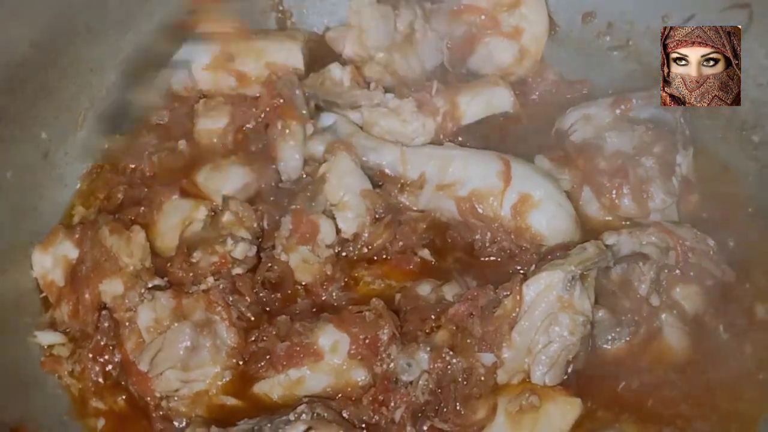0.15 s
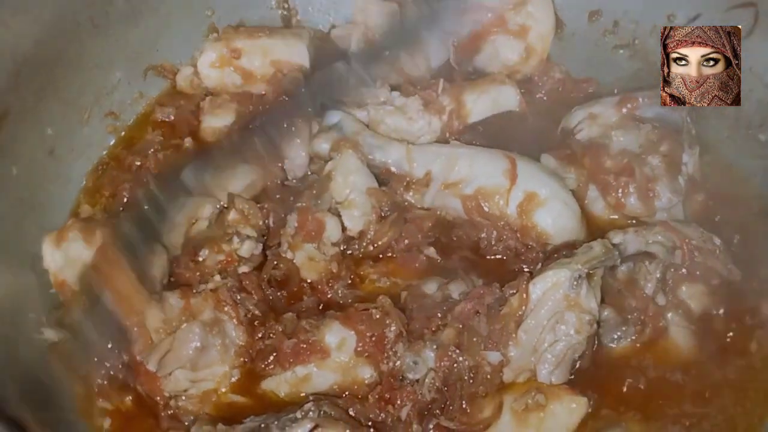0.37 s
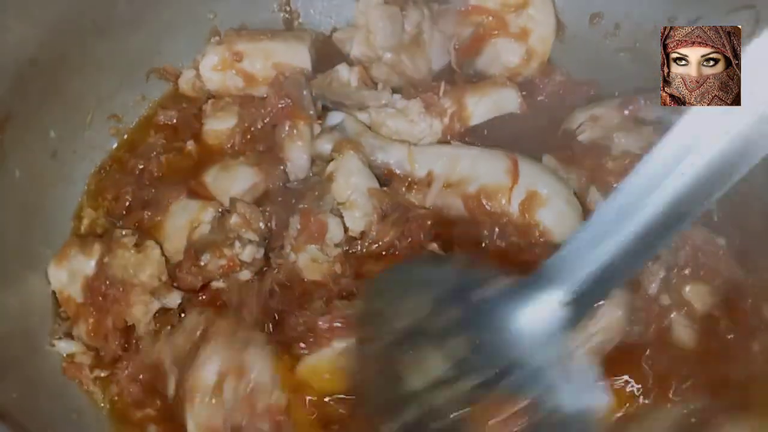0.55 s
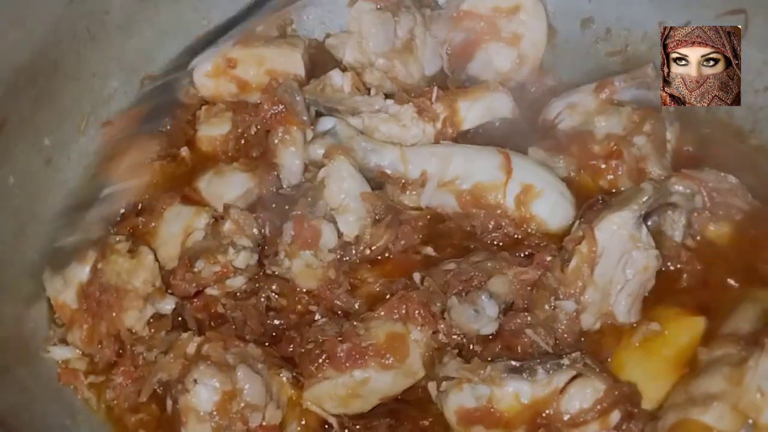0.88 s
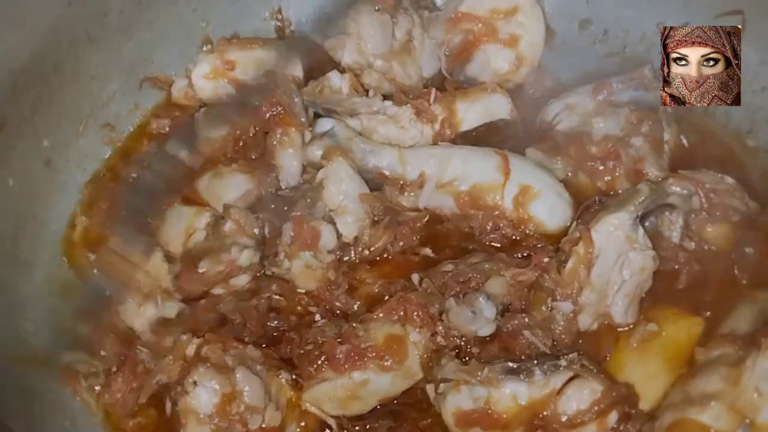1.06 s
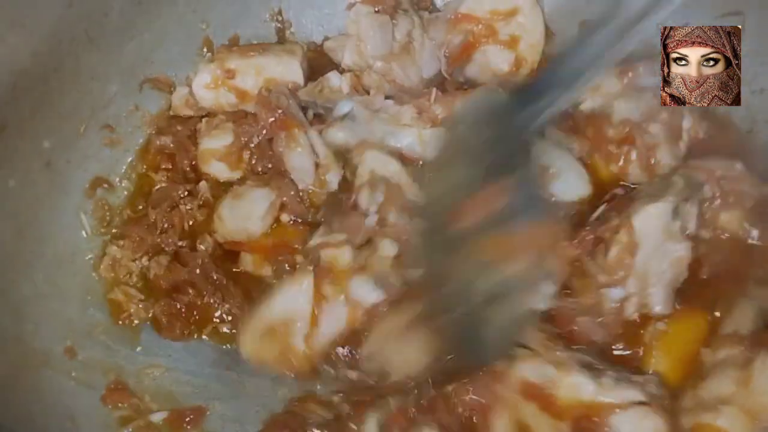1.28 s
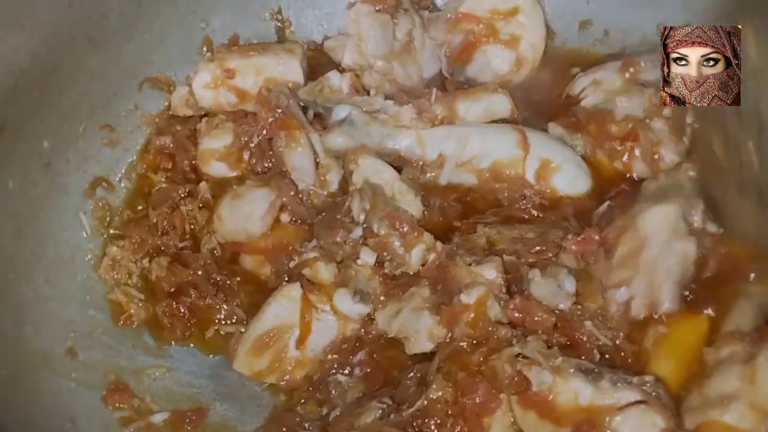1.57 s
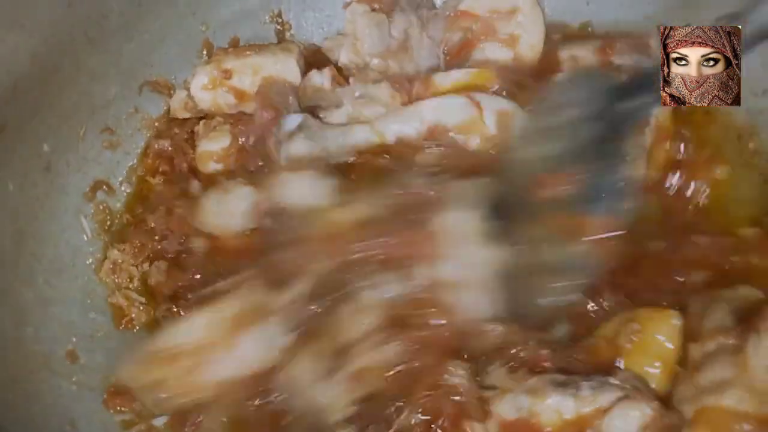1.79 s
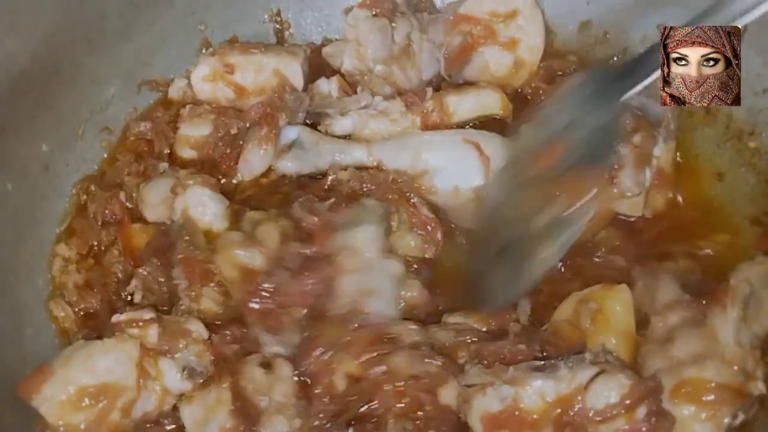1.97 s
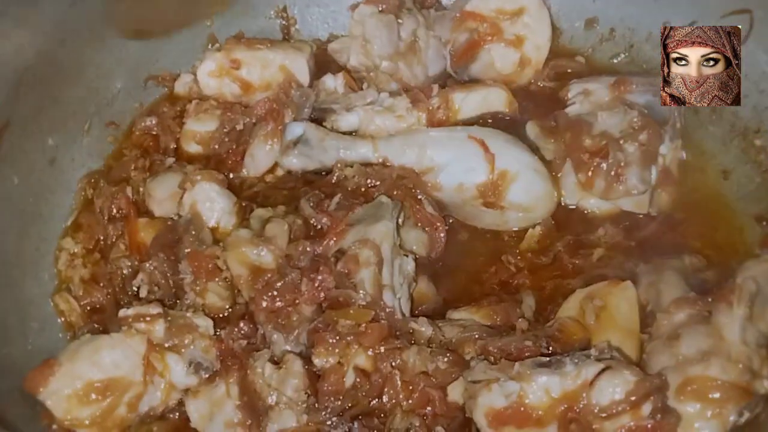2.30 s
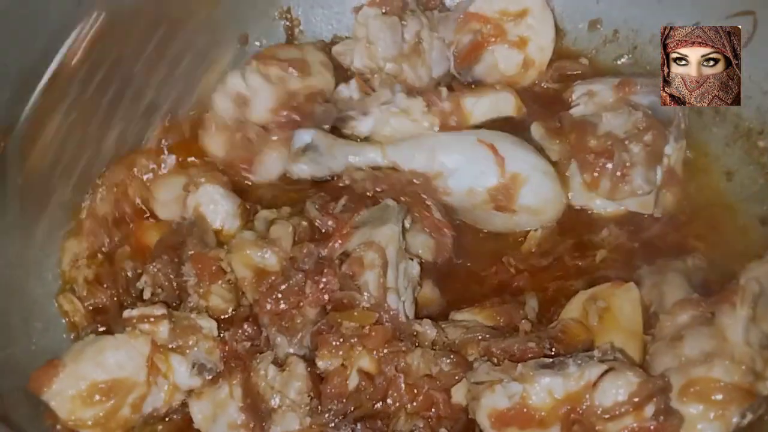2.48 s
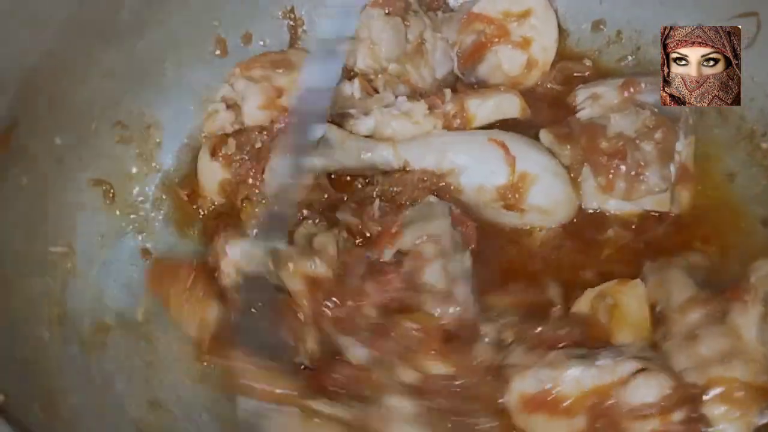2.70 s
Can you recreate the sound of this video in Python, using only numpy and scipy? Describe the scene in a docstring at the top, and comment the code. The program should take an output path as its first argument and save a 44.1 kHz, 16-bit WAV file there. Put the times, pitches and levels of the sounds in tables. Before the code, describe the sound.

Close-miked stirring in a small kitchen: two ringing spoon clanks with a harsh scrape and judder between, soft wet plops of meat, brighter sizzle, then a thinner, crackier clank and faint squeaky scraping.

```python
"""A metal spoon stirs meat and sauce in a metal pot on the stove, heard from close by in a small kitchen.
It clanks on the wall three times, scrapes and squeaks along the metal and judders over the bottom.
Decaying and rubbed tones make the pot ring; shaped noise and tiny random slips make the rough sounds.
Wet pieces flop and squelch, and fat spits. The food sizzles throughout as countless bursting bubbles,
brighter once it has been turned onto the hot metal. A low hum lies underneath."""
import sys
import numpy as np
from scipy import signal
from scipy.fft import rfft, irfft, next_fast_len
from scipy.io import wavfile
from scipy.ndimage import uniform_filter1d, map_coordinates

SR = 44100
rng = np.random.default_rng(int(sys.argv[2]) if len(sys.argv) > 2 else 0)


def transcribe(u):
    """Save the signal u as a 16-bit wav file named by the first command-line argument.

    u: samples, shape (n,) or (channels, n), limited to [-1, 1]; the rate is SR.
    q: integer samples, one column per channel.
    """
    v = np.clip(np.atleast_2d(u).T, -1, 1)
    q = np.round(v * 32767).astype(np.int16)
    wavfile.write(sys.argv[1], SR, q)


N = 125685

# In all tables, T60/s is the time to fade by 60 dB. A spectrum's levels are relative.

# Sauce simmering: loudness over time [t/s, level/dB] and spectrum [f/Hz, level/dB]
SIMMER_LEVEL = [(0, -45), (.65, -42), (.9, -50), (1.15, -47), (1.35, -45.5), (1.5, -49.5), (1.565, -46),
                (1.65, -39.5), (2.0, -51.5), (2.3, -50), (2.65, -43), (2.85, -47.5)]
SIMMER_SPECTRUM = [(200, -22), (500, 1.5), (850, 11.5), (1300, 9.5), (2000, 8), (4000, 6), (5800, -6),
                   (7700, -2), (9500, -15.5), (13000, -16.5), (16000, -21)]
# Fresh food on hot metal: loudness over time [t/s, level/dB] and spectrum [f/Hz, level/dB]
SEAR_LEVEL = [(0, -53.5), (1.55, -63.5), (1.65, -51.5), (1.85, -41.5), (2.0, -40.5), (2.3, -45),
              (2.85, -45.5)]
SEAR_SPECTRUM = [(1000, -8.5), (3000, 9), (4300, 7.5), (5800, -0.5), (7000, 9.5), (7600, 12.5), (8800, 3.5),
                 (11000, -3.5), (13200, 3.5), (16000, -7)]
# Low kitchen background: spectrum [f/Hz, level/dB]
HUM_SPECTRUM = [(20, -35), (55, -35), (105, -2), (150, -9.5), (500, -11), (1500, -73)]
# Spits of fat [t/s, level/dB] and their spectrum [f/Hz, level/dB]
SPITS = [(0.0339, -25.5), (0.491, -26), (0.67, -35.5)]
SPIT_SPECTRUM = [(80, -51), (600, 13.5), (1500, 4.5), (4000, 12), (8000, 3.5), (16000, -6)]
# Clanks on the wall, one at each spot in turn
# [t/s, clang level/dB, crack level/dB, thump level/dB, clang T60/s, upper edge of the crack f/Hz]
CLANKS = [(.205, -12.5, -11.5, -31.5, 0.053, 11100), (0.9417, -14.5, -14.5, -29, 0.055, 8200),
          (2.3461, -29, -11, -35, 0.052, 16000)]
# Brief resonances of the spoon pressed on the wall
# [f/Hz, width/Hz, level at spot 0/dB, level at spot 1/dB, level at spot 2/dB]
CLANG_TONES = [(809, 7.3, -3.5, 4.5, 8), (968, 32, -31, -40, 9.5), (1201, 21, -10, -8.5, 3),
               (1635, 15, -4.5, -21, -36), (1952, 73, -4, -20, -6), (2803, 45, -4.5, -3, 1),
               (3350, 41, -15, -3, -18), (4320, 280, -5.5, -25, 12), (7460, 380, -1.5, -24, 6)]
# Spectra of a clank's crack and thump [f/Hz, level/dB]
CRACK_SPECTRUM = [(200, -38), (800, -6), (1400, -2), (3000, 11.5), (4500, 14.5), (5800, 7), (7600, 15),
                  (9300, 3), (13000, 5.5), (16000, -6)]
THUMP_SPECTRUM = [(40, -26), (110, -28), (175, 11), (215, 3), (310, 8), (500, -0.5), (800, -51)]
# The pot's modes, the tones it likes to ring at
# [f/Hz, T60/s, level struck at spot 0/dB, at spot 1/dB, at spot 2/dB, level when rubbed/dB]
POT_MODES = [(445, 0.32, -35.5, -41, -65, 2), (510.8, 1.11, -45, -39, -61, -7),
             (661, 0.26, -32, -34.5, -37, 3.5), (823.4, 0.57, -20, -32.5, -38, -4),
             (1100, 0.46, -56, -48, -49, -7.5), (1172, 0.41, -31, -37, -51, -3),
             (1627, 0.34, -20.5, -35.5, -59, -2), (1644, 0.65, -29, -40.5, -28, -27),
             (2227, 0.42, -31.5, -53, -44, -1), (2393, 0.21, -31, -40, -45, -4.5),
             (2837, 0.15, -30, -25.5, -39, -6), (3418, 0.21, -44, -32.5, -52, -6),
             (3490, 0.15, -26.5, -55, -39, 1.5), (4260, 0.19, -25, -35.5, -27.5, -3.5)]
# Scraping strokes [t of the peak/s, rise/s, fall/s, grit level/dB, pot ring level/dB]
SCRAPES = [(.25, 0.032, 0.05, -35.5, -41.5), (0.372, 0.041, 0.022, -18, -23.5), (.43, 0.032, 0.1, -38, -47),
           (1.655, 0.014, 0.022, -34, -61), (2.366, 0.0049, 0.039, -36, -42.5),
           (2.412, 0.019, 0.013, -36.5, -42), (2.474, 0.05, 0.009, -33.5, -58),
           (2.533, 0.031, 0.038, -27, -34)]
# Spectrum of the gritty scraping hiss [f/Hz, level/dB]
GRIT_SPECTRUM = [(50, -44), (170, 2), (900, -0.5), (1400, -4), (2300, 1.5), (2850, 0.5), (3500, 5),
                 (4300, 9), (5500, -2.5), (7900, 5.5), (9300, -7), (12500, -9), (16000, -16)]
# The rim squeaks under the spoon [t of the peak/s, half length/s, f at the peak/Hz, level/dB]
SQUEAKS = [(0.317, 0.013, 770, -29), (0.33, 0.009, 3480, -25.5), (0.341, .014, 704.4, -25),
           (0.353, 0.018, 1635, -25), (0.379, 0.0055, 807, -22.5), (0.389, 0.012, 4227, -23.5),
           (2.442, 0.06, 832, -34.5), (2.468, 0.012, 811.5, -23), (2.533, 0.01, 807, -21),
           (2.557, 0.0094, 810, -26.5)]
# The spoon judders over the bottom [t of the peak/s, rise/s, fall/s, level/dB, pot ring level/dB]
JUDDERS = [(.405, 0.02, 0.018, -25, -21), (0.464, 0.083, 0.031, -31, -42.5)]
# Spectrum of the judder [f/Hz, level/dB]
JUDDER_SPECTRUM = [(50, -35), (130, -8.5), (195, 3), (250, 5), (300, -14), (370, 4.5), (570, -38),
                   (720, -2), (1050, -8), (1400, -24), (3000, -57)]
# Knocks of a bone in the food while the spoon judders [t/s, f/Hz, level/dB]
JOLTS = [(.396, 750, -7), (.4046, 330, -2), (.4240, 600, -16)]
# Pieces of meat flop down [t/s, level/dB, T60/s] and their spectrum [f/Hz, level/dB]
FLOPS = [(1.043, -41, 0.13), (1.419, -47.5, 0.066), (1.581, -46.5, .2), (1.655, -39.5, 0.21),
         (1.748, -31, 0.3)]
FLOP_SPECTRUM = [(40, -37), (110, -15.5), (170, -3), (245, -2), (300, -11.5), (400, -5), (520, -13.5),
                 (620, -21), (820, -10.5), (1400, -48)]
# Wet pockets pop in the sauce [t of the peak/s, f at the peak/Hz, level/dB, length/s]
POPS = [(1.172, 2940, -43, 0.0047), (1.355, 3100, -43, 0.0068), (1.435, 3190, -47, 0.0054),
        (1.579, 677, -38, .003), (1.586, 2574, -34.5, 0.0035), (1.5923, 3710, -27, 0.0032)]
# How long the room rings at each pitch [f/Hz, T60/s]
ROOM_T60 = [(150, 0.64), (1000, 0.34), (5000, 0.51), (14000, 0.093)]

BURSTS_PER_S = 5000  # bursting bubbles in each kind of sizzle
HUM_DB, ROOM_DB = -58, -11
SPIT_T60_S = 0.038
CONTACT_S, CRACK_T60_S, THUMP_T60_S = 0.0053, 0.055, 0.23  # CONTACT_S: time constant of a blow's rise
BOTTOM_HZ = 168.3  # the pot's heavy bottom
SCRAPE_LOW_HZ = 587  # scraping the wall hardly reaches modes below this
JUDDER_TOP_HZ = 850  # juddering hardly reaches modes well above this
BUILD_S, RING_WAVER_DB = 0.073, 2.5  # time for rubbing to build up a mode; unsteadiness of the ring
RUB_BLUR_HZ = 11.2  # the modes smear while the spoon bears on them
SLIPS_PER_S = 8000  # tiny slips of a scrape
GRIT_PATCH_DB = 2.5  # the hiss flares in patches as the point of contact moves
SQUEAK_SAG_PER_S = 1.2  # fall of log pitch through a squeak
JUDDER_PER_S = 260  # typical rate of the coarse slips
JOLT_T60_S = 0.016
POP_RISE = 0.095  # log pitch swings this far either side of the middle of a pop
TOP_HZ = 16000  # upper limit of the finished sound


def amp(db):
    """Turn decibels into a plain gain."""
    return 10 ** (np.asarray(db) / 20)


def unit(x):
    """x scaled to an rms (average strength) of 1."""
    return x / np.sqrt(np.mean(x ** 2) + 1e-20)


def clock():
    """The time of every sample, in seconds."""
    return np.arange(N) / SR


def along(points, hz):
    """Read a (Hz, value) curve at the given pitches, on a log axis."""
    f, v = np.transpose(points)
    return np.interp(np.log(hz + 1), np.log(f + 1), v)


def filtered(x, response):
    """x with each frequency multiplied by response(hz)."""
    m = next_fast_len(N + SR)
    hz = np.fft.rfftfreq(m, 1 / SR)
    return irfft(rfft(x, m) * response(hz), m)[:N]


def colour(x, spectrum):
    """x shaped by a (Hz, dB) spectrum, at rms 1."""
    return unit(filtered(x, lambda hz: amp(along(spectrum, hz))))


def noise(spectrum):
    """Random noise shaped by a spectrum, at rms 1."""
    return colour(rng.standard_normal(N), spectrum)


def wobble(rate):
    """A smooth curve through random points, rate of them a second."""
    return map_coordinates(rng.standard_normal(N // 8), [clock() * rate], mode="wrap")


def tone(hz, width_hz, start=0):
    """A sine of rms 1, steady or gliding, blurred to a width by drifting phase; its phase is zero at start."""
    steps = rng.standard_normal(N) * np.sqrt(2 * np.pi * np.abs(width_hz) / SR)
    drift = uniform_filter1d(np.cumsum(steps), size=90)
    phase = 2 * np.pi * np.cumsum(hz + np.zeros(N)) / SR + drift
    return np.sqrt(2) * np.sin(phase - phase[round(start * SR)])


def grains(rate, scatter_db):
    """Random clicks of uneven size, rate of them a second on average, rms 1."""
    happens = rng.random(N) < rate / SR
    sign = rng.choice([-1, 1], N)
    size = amp(scatter_db * np.clip(rng.standard_normal(N), -2, 2))
    return unit(happens * sign * size)


def blow(s, attack, t60):
    """The loudness of a blow: a quick rise at s, then an exponential decay."""
    t = np.maximum(clock() - s, 0)
    return (1 - np.exp(-t / attack)) * np.exp(-np.log(1000) * t / t60)


def stroke(s, rise, fall):
    """Pressure swells to a peak at s, then lets go."""
    t = clock() - s
    swell = np.abs(t / rise) ** 1.33
    release = np.abs(t / fall) ** 1.31
    return np.exp(-np.where(t < 0, swell, release))


def pressure(strokes, column):
    """The summed swells of a table of strokes, at the levels of one column."""
    return sum(amp(row[column]) * stroke(*row[:3]) for row in strokes)


def sizzle():
    """Countless bursting bubbles: a dull simmer of sauce and a bright sear on bare metal."""
    def level(rows):
        return amp(np.interp(clock(), *np.transpose(rows)))

    simmer = colour(grains(BURSTS_PER_S, scatter_db=8.0) + rng.standard_normal(N), SIMMER_SPECTRUM)
    sear = colour(grains(BURSTS_PER_S, scatter_db=5) + rng.standard_normal(N), SEAR_SPECTRUM)
    return level(SIMMER_LEVEL) * simmer + level(SEAR_LEVEL) * sear


def hum():
    """The low kitchen background is steady, deep noise."""
    return amp(HUM_DB) * noise(HUM_SPECTRUM)


def spits():
    """Fat spits: each is a short burst of noise."""
    loudness = sum(amp(db) * blow(s, 0.0018, SPIT_T60_S) for s, db in SPITS)
    return noise(SPIT_SPECTRUM) * loudness


def thud(s, t60):
    """The pot's heavy, damped bottom answers a blow at s with a low tone."""
    swing = np.sqrt(2) * np.sin(2 * np.pi * BOTTOM_HZ * (clock() - s))
    return swing * blow(s, CONTACT_S, t60)


def clanks():
    """Each blow: a crack, a short clang of spoon on wall and a thump of the whole pot."""
    out = np.zeros(N)
    crack_noise, thump_noise = noise(CRACK_SPECTRUM), noise(THUMP_SPECTRUM)
    for spot, (s, clang_db, crack_db, thump_db, t60, edge_hz) in enumerate(CLANKS):
        clang = sum(amp(db[spot]) * tone(hz, width, s) for hz, width, *db in CLANG_TONES)
        out += amp(clang_db) * clang * blow(s, CONTACT_S, t60)
        crack = filtered(crack_noise, lambda hz: 1 / np.hypot(1, hz / edge_hz))
        # the crack leads by a millisecond
        out += amp(crack_db) * crack * blow(s - .001, CONTACT_S, CRACK_T60_S)
        thump = thump_noise * blow(s, CONTACT_S, THUMP_T60_S) + thud(s, t60=0.17)
        out += amp(thump_db) * thump
    return out


def pot_ring():
    """Blows set each mode ringing; scrapes feed the high modes and judders the low ones.
    The ring wavers and smears under the spoon and is cleaner once let go."""
    scraping, juddering = pressure(SCRAPES, column=-1), pressure(JUDDERS, column=-1)
    contact = (scraping + juddering) / np.max(scraping + juddering)
    out = np.zeros(N)
    for hz, t60, *struck_db, rubbed_db in POT_MODES:
        from_scrapes = scraping / (1 + (SCRAPE_LOW_HZ / hz) ** 8)
        from_judders = juddering / (1 + (hz / JUDDER_TOP_HZ) ** 4)
        power = (amp(rubbed_db) * (from_scrapes + from_judders)) ** 2
        # the share of its energy that the mode keeps from one sample to the next
        keep = np.exp(-2 * np.log(1000) / (t60 * SR))
        stored = signal.lfilter([1], [1, -keep], power) / (BUILD_S * SR)
        struck = sum(amp(db) * blow(row[0], CONTACT_S, t60) for row, db in zip(CLANKS, struck_db))
        loudness = np.sqrt(stored + struck ** 2)
        waver = amp(RING_WAVER_DB * np.sqrt(contact) * wobble(70))
        out += loudness * waver * tone(hz, 2 + RUB_BLUR_HZ * contact, start=CLANKS[0][0])
    return out


def patchy(x, depth_db):
    """x with a random gain in patches a few milliseconds long and some hundred Hz wide."""
    z = signal.stft(x, nperseg=256)[2]
    field = uniform_filter1d(rng.standard_normal(z.shape), size=4, axis=0)  # blend over pitch
    field = uniform_filter1d(field, size=3, axis=1)  # blend over time
    return signal.istft(z * amp(depth_db * unit(field)), nperseg=256)[1][:N]


def scrapes():
    """Dense tiny slips of the spoon's edge make a ragged hiss in the wall."""
    slips = grains(SLIPS_PER_S, scatter_db=3.0)
    hiss = colour(patchy(slips, GRIT_PATCH_DB), GRIT_SPECTRUM)
    raggedness = amp(0.55 * wobble(160))
    return pressure(SCRAPES, column=-2) * raggedness * hiss


def squeaks():
    """Stick and slip lock briefly near one of the wall's modes, sagging in pitch."""
    out = np.zeros(N)
    for s, half, hz, db in SQUEAKS:
        t = clock() - s
        sagging_hz = hz * np.exp(-SQUEAK_SAG_PER_S * t)
        out += amp(db) * np.exp(-(t / half) ** 2) * tone(sagging_hz, width_hz=10.5)
    return out


def judders():
    """Coarse, uneven slips on the pot's bottom, with some noise mixed in."""
    turns = np.cumsum(JUDDER_PER_S * np.exp(.5 * wobble(300))) / SR
    # one slip at each whole turn, each of a different size
    clicks = np.diff(np.floor(turns), prepend=0)
    slips = unit(clicks * amp(5.3 * rng.standard_normal(N)))
    rumble = colour(slips + 0.34 * rng.standard_normal(N), JUDDER_SPECTRUM)
    return pressure(JUDDERS, column=-2) * rumble


def jolts():
    """A bone in the food knocks while the spoon judders: each jolt is a dull, quickly fading knock."""
    out = np.zeros(N)
    for s, hz, db in JOLTS:
        swing = np.sin(2 * np.pi * hz * (clock() - s))
        out += amp(db) * swing * blow(s, 2 / hz, JOLT_T60_S)
    return out


def flops():
    """Meat flops down: lumpy noise, with a thud of the pot's bottom."""
    lumps = amp(1.7 * wobble(90)) * noise(FLOP_SPECTRUM)
    out = np.zeros(N)
    for s, db, t60 in FLOPS:
        out += amp(db) * (lumps * blow(s, 0.00046, t60) + thud(s, t60=0.15))
    return out


def pops():
    """Air pockets open in the sauce as the pieces part, each a brief blurred tone sliding up."""
    out = np.zeros(N)
    for s, hz, db, length in POPS:
        u = np.clip((clock() - s) / length, -10, 10)
        rising_hz = hz * np.exp(POP_RISE * np.tanh(u / 2))
        out += amp(db) * np.exp(-np.abs(u)) * tone(rising_hz, 0.089 * hz)
    return out


def kitchen(x):
    """The room's echoes of x: a short noise tail that fades at its own speed at each pitch."""
    hz, t, z = signal.stft(rng.standard_normal(SR * 3 // 4), SR, nperseg=256)
    decay = np.exp(-np.log(1000) * t / along(ROOM_T60, hz)[:, None])
    tail = signal.istft(z * decay, SR, nperseg=256)[1]
    tail *= 1 - np.exp(-np.arange(len(tail)) / SR / 0.0027)  # the echoes build up softly
    return signal.fftconvolve(x, tail / np.linalg.norm(tail))[:N]


def scene():
    """Spoon, pot and food with their room echoes, over the sizzle and hum."""
    stirring = pot_ring() + clanks() + scrapes() + judders() + jolts() + squeaks()
    stirred_food = flops() + spits() + pops()
    near = stirring + stirred_food
    return (near + amp(ROOM_DB) * kitchen(near) + sizzle() + hum())[None]


def record(dry):
    """The recorder keeps nothing above its band limit."""
    return filtered(dry[0], lambda hz: hz < TOP_HZ)[None]


dry = scene()
out = record(dry)
transcribe(out)
```